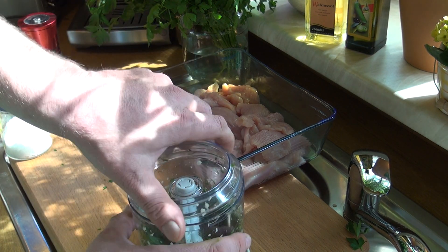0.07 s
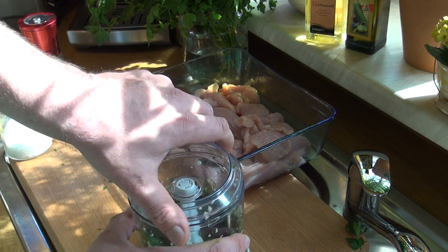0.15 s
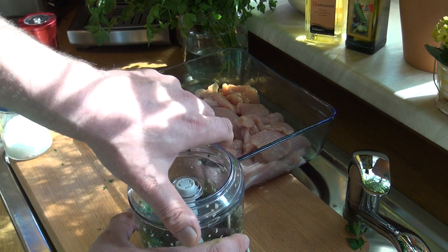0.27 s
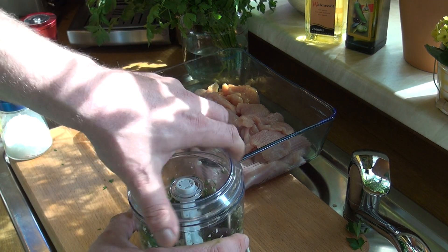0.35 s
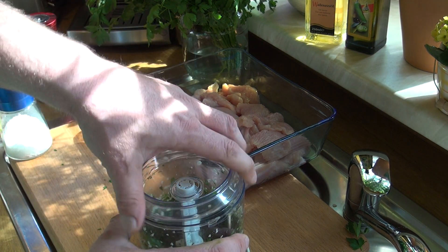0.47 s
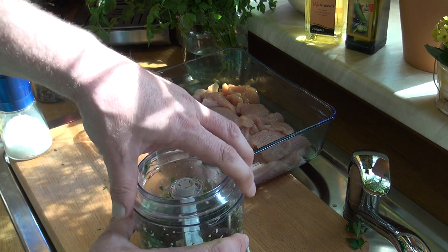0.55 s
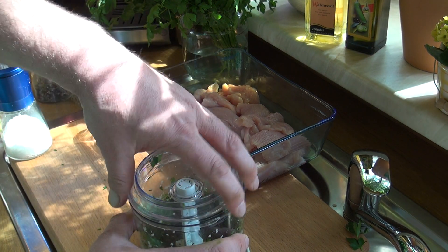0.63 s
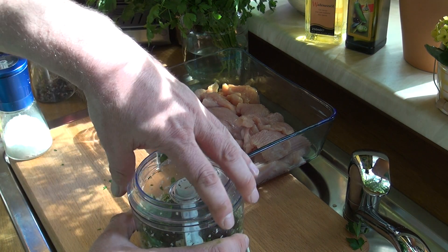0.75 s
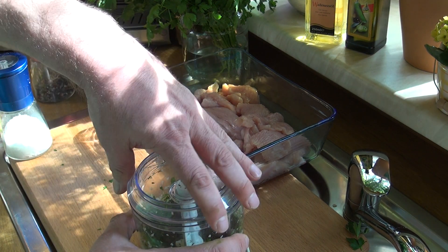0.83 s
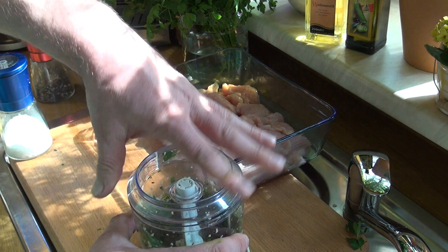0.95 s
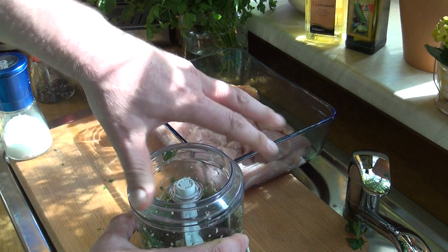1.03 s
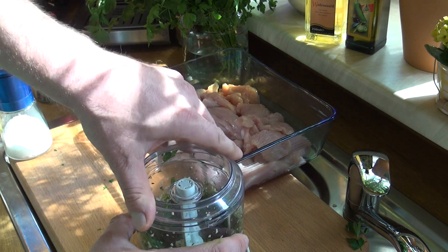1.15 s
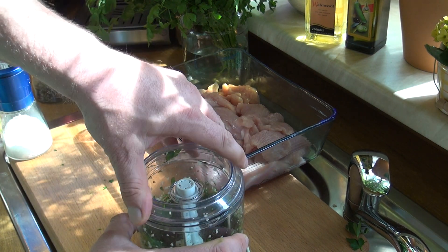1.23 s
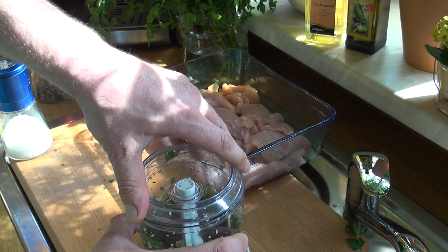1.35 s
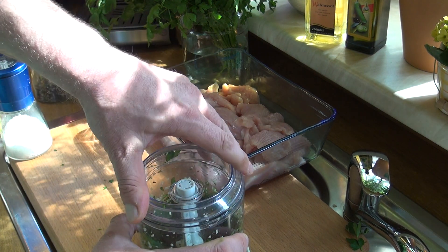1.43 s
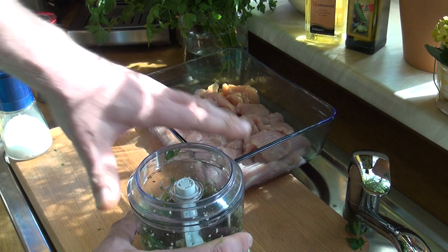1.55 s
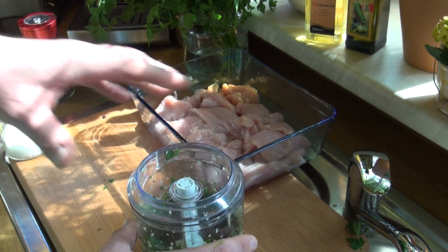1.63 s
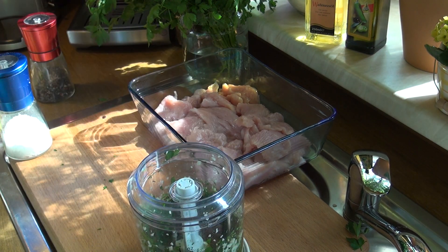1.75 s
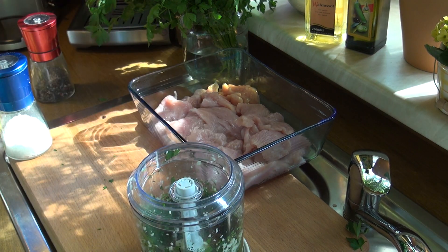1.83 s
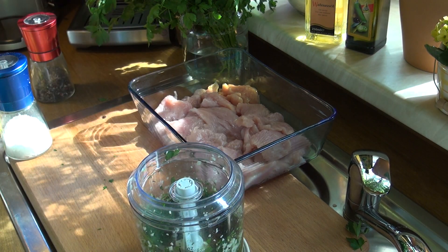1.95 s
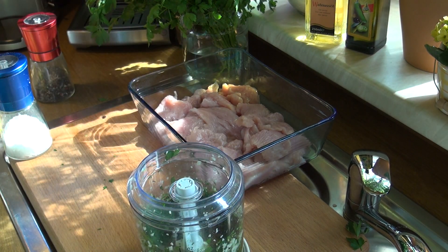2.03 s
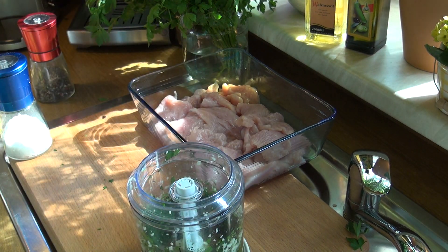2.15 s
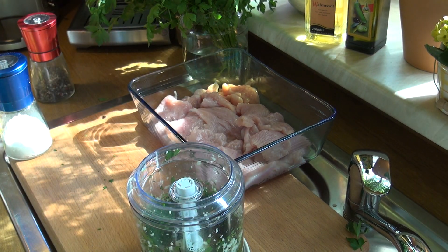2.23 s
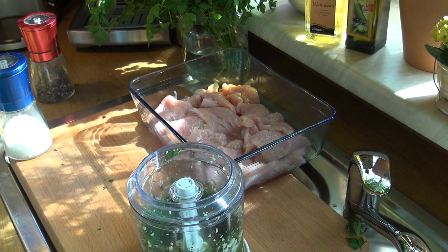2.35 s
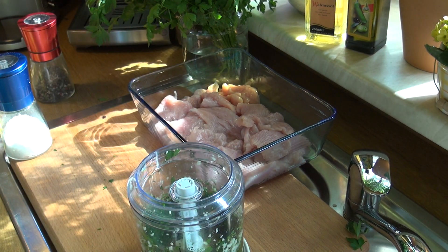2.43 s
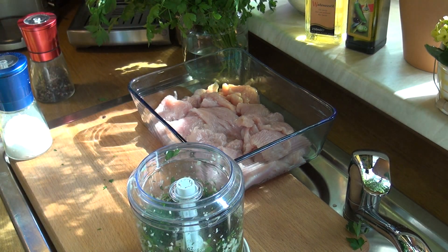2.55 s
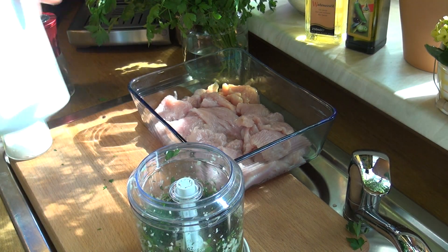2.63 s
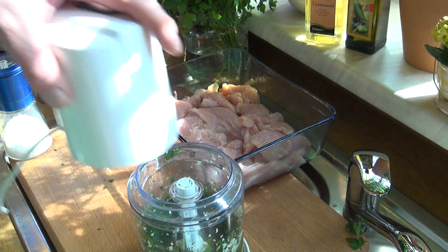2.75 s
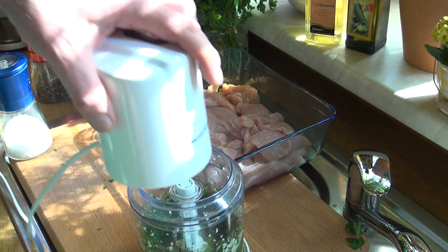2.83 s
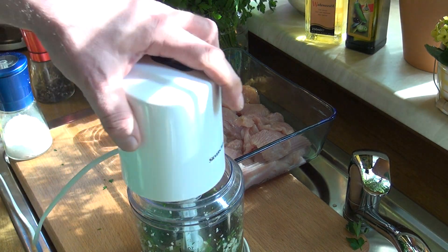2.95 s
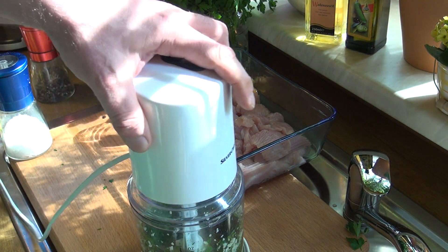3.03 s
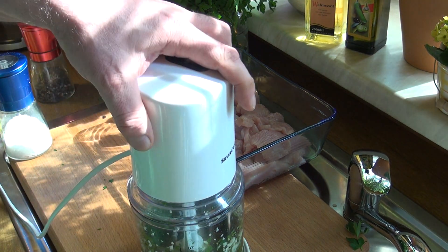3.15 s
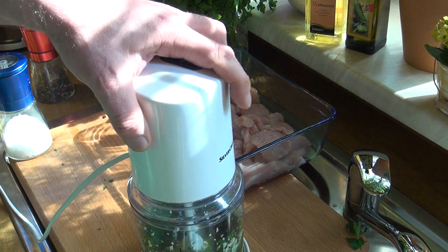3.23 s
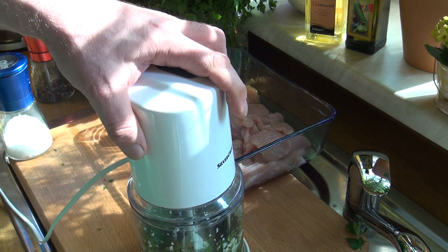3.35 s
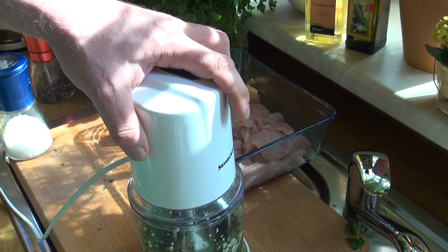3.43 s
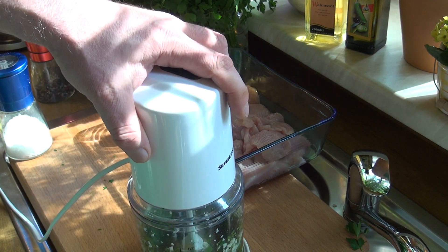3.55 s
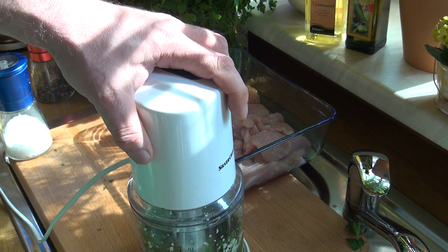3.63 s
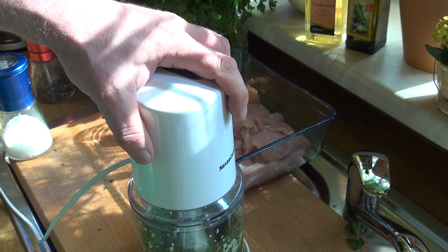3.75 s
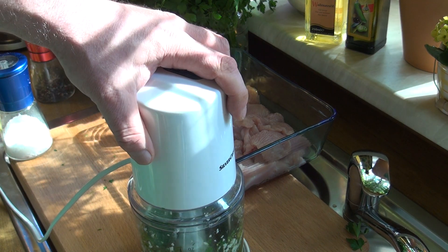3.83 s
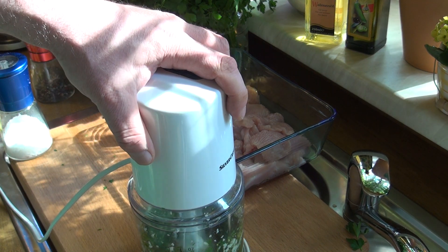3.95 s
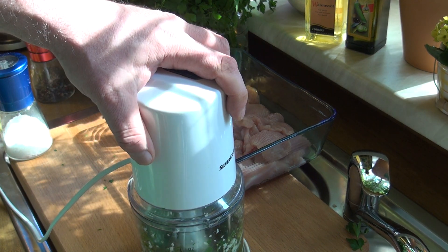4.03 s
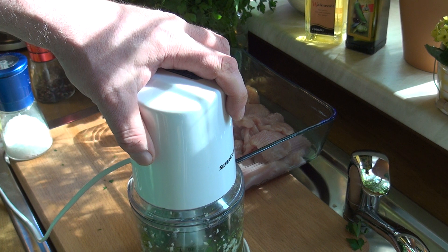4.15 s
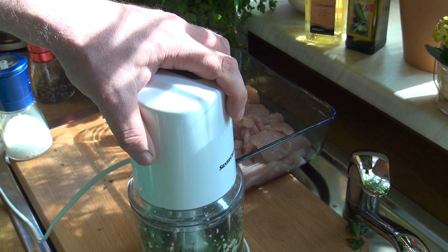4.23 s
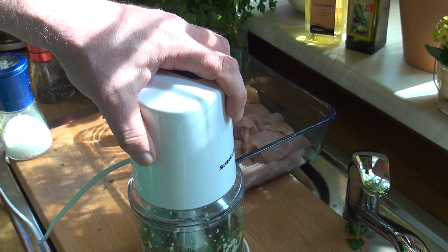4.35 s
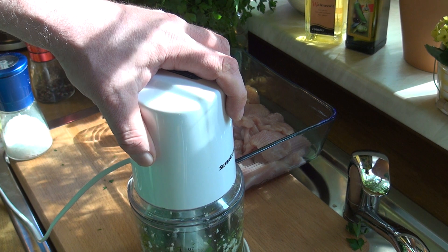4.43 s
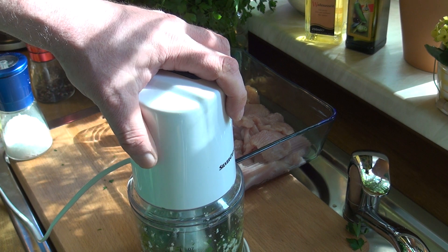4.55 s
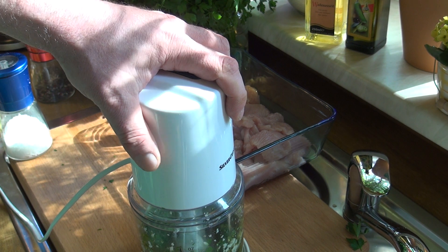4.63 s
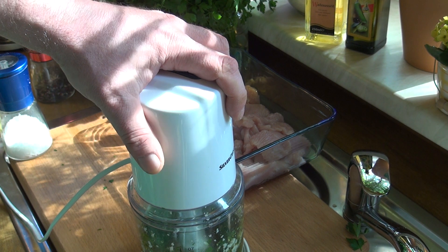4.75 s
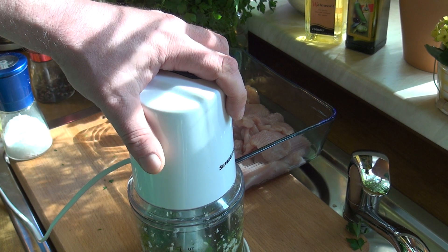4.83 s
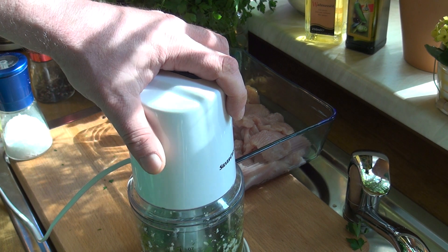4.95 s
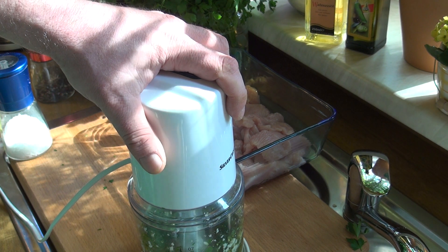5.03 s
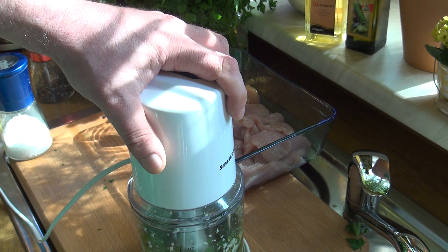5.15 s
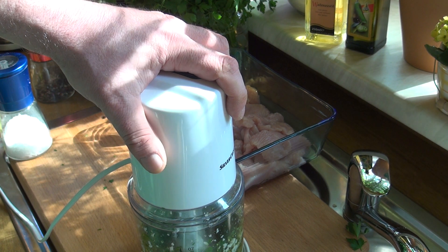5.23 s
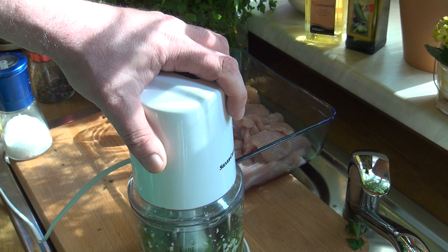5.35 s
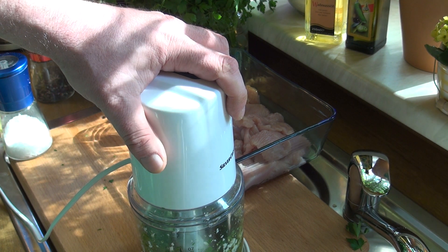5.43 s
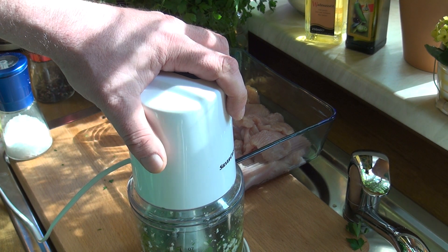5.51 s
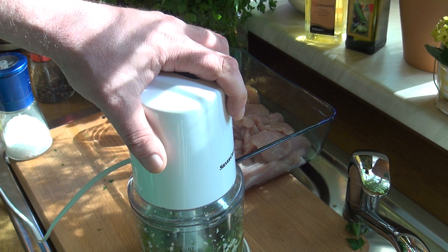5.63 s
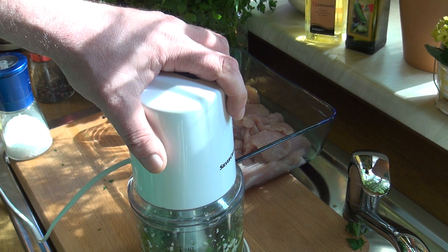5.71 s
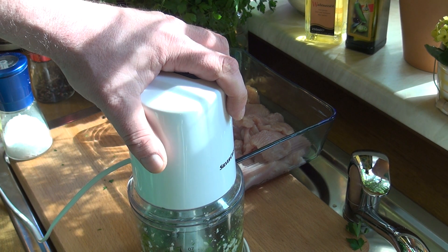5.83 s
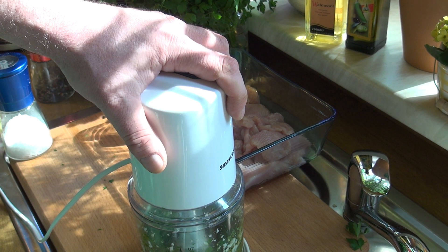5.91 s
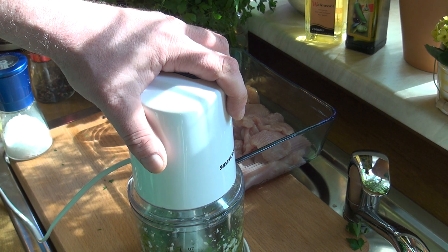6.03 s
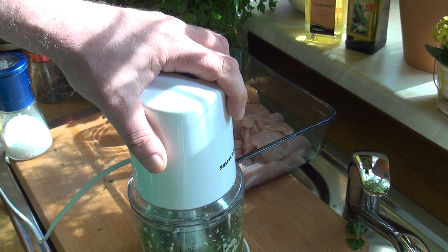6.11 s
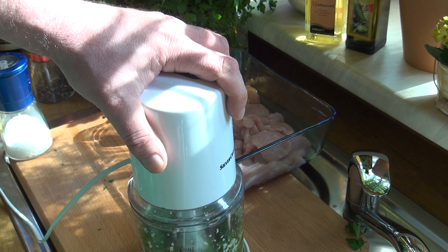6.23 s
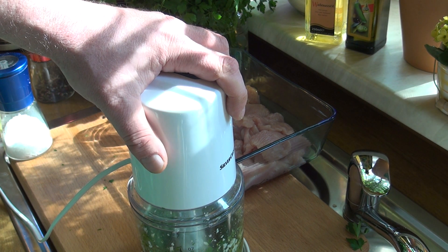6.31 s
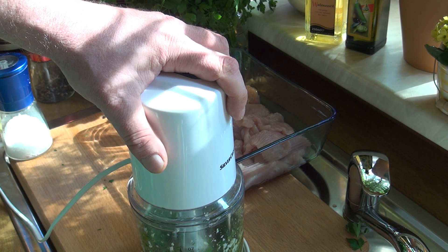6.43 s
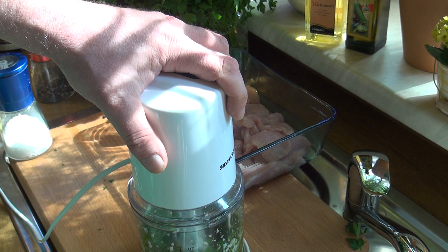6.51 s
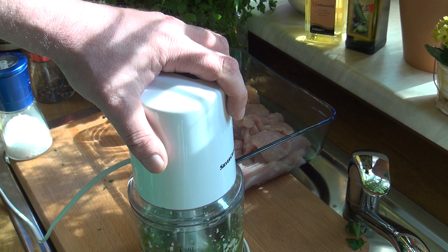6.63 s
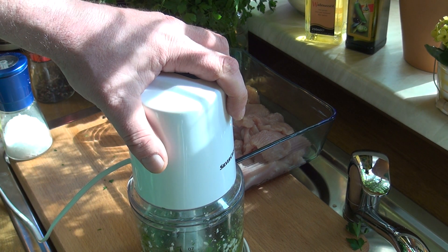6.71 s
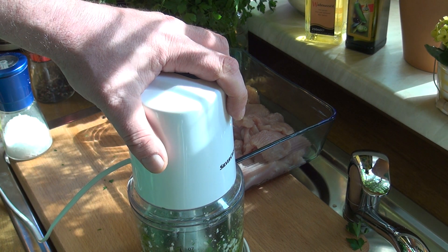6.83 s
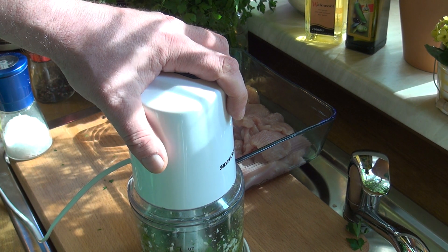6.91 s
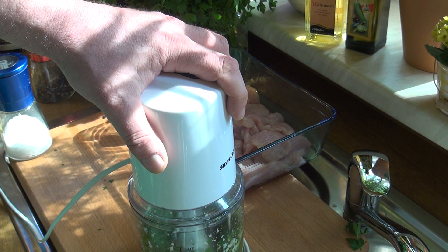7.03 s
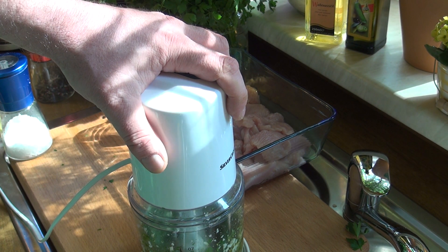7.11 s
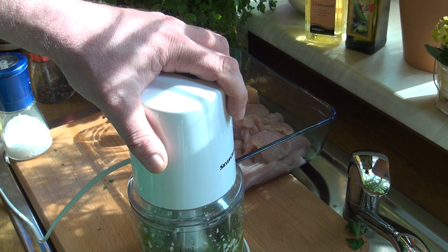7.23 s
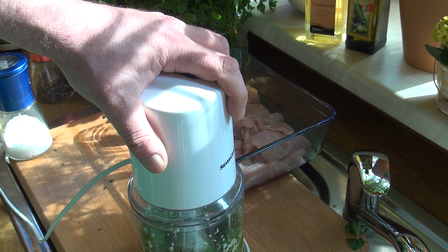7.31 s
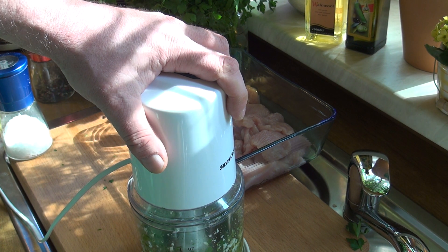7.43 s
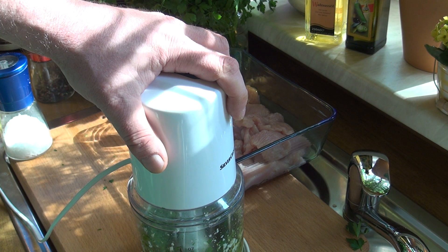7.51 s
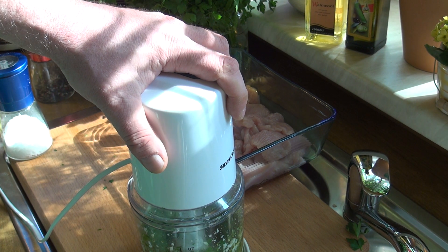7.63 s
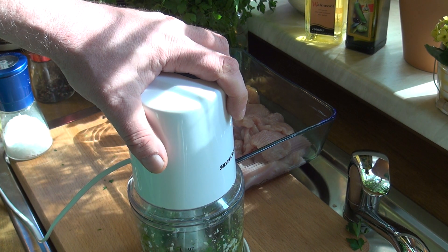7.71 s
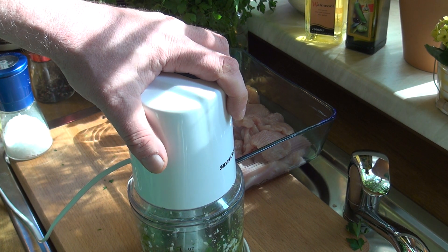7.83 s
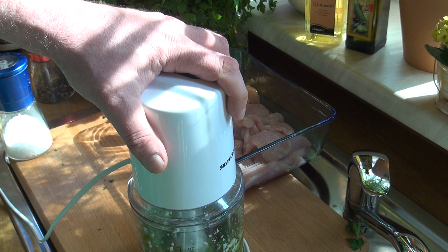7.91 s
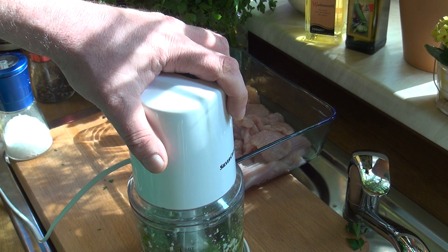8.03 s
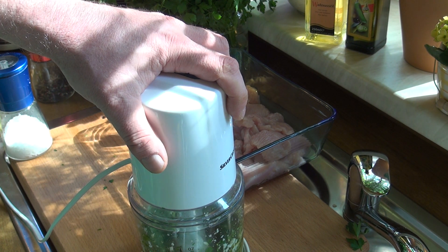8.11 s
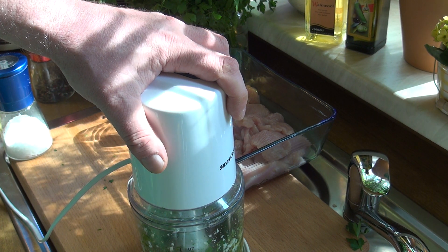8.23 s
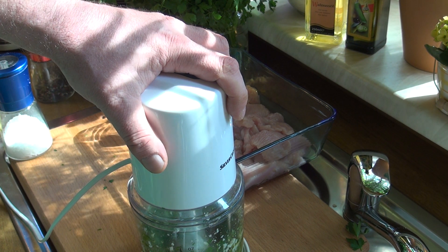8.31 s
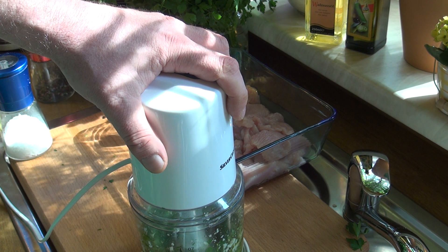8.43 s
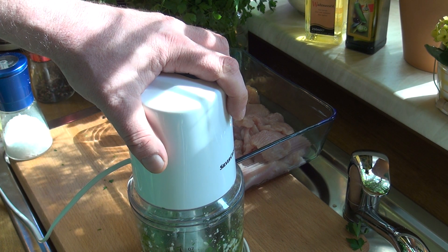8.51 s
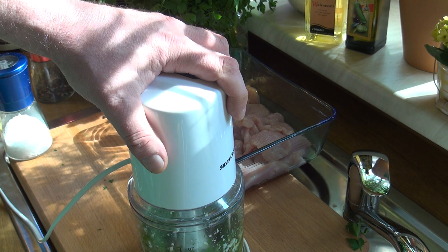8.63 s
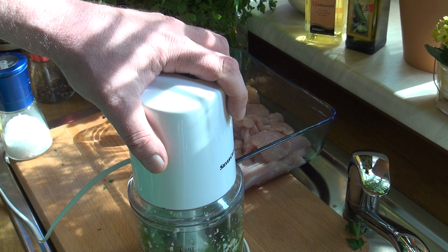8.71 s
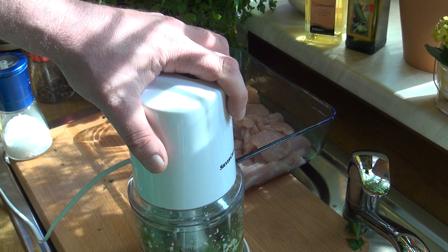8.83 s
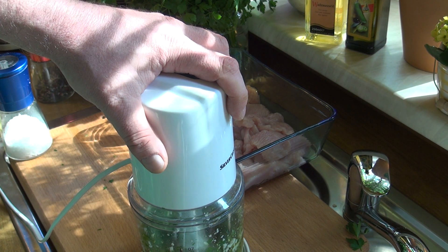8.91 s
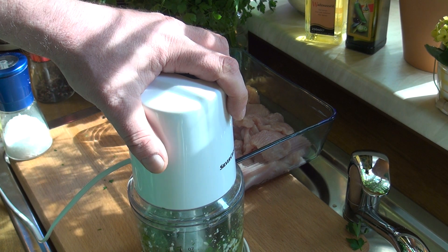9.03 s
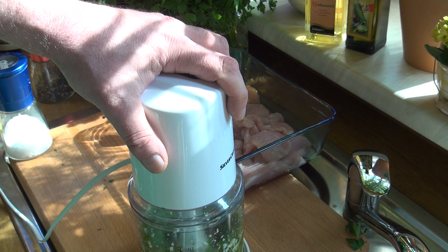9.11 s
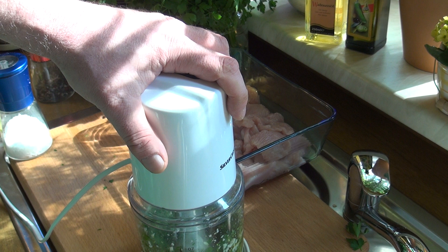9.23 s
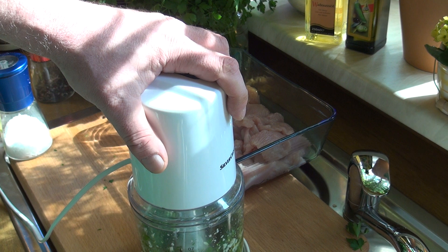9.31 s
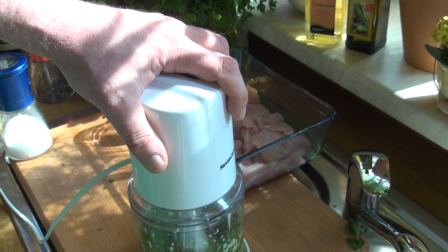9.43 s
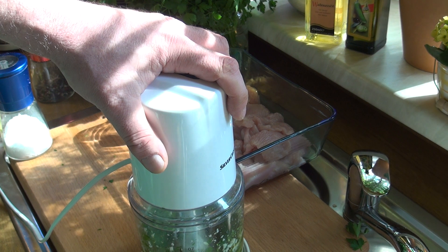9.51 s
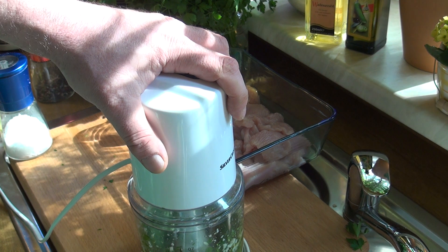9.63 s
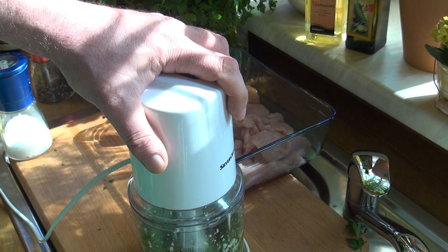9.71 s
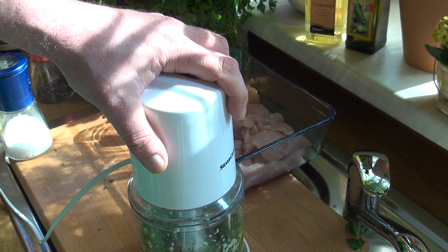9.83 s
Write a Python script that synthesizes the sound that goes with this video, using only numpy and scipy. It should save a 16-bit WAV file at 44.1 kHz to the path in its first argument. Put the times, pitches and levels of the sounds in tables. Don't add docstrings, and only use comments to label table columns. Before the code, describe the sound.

Close up in a quiet kitchen, a thin plastic lid knocks and ticks on a bowl, rubs briefly as it twists, then snaps sharply home with more clicks. A near-silent pause follows. A hollow motor block clatters onto the bowl and is pressed down, then a small electric motor starts abruptly and runs continuously, harsh rattling gears over a thin wavering whine and board hum.

```python
import sys
import numpy as np
from scipy import signal
from scipy.fft import rfft, irfft, next_fast_len
from scipy.io import wavfile

SR = 44100
rng = np.random.default_rng(int(sys.argv[2]) if len(sys.argv) > 2 else 0)


def unload_audio(sound):
    columns = np.transpose(np.atleast_2d(sound))
    steps = np.round(np.clip(columns, -1, 1) * 32767)
    wavfile.write(sys.argv[1], SR, steps.astype(np.int16))


def to_linear_factor(level_db):
    exponent = np.asarray(level_db, float) / 20
    return 10 ** exponent


N = 434826
BLOCK_FROM_S, SET_DOWN_S, SWITCH_ON_S = 2, 2.95, 3.622

# (frequency [Hz], width [Hz], gain [dB])
BOWL_PEAKS = [(244, 47, 11), (314.6, 67, 12.5), (449, 45, 11), (800, 170, 4.5), (1070, 40, 1.5),
              (1580, 90, -4), (2500, 400, -5.5)]


def rms_one(x):
    return x / np.sqrt(np.mean(x ** 2) + 1e-20)


def in_time(rows):
    s, *columns = np.transpose(rows)
    return [np.interp(np.arange(N) / SR, s, c) for c in columns]


def coloured(x, points):
    size = next_fast_len(N)
    hz, db = np.transpose(points)
    bins = np.fft.rfftfreq(size, 1 / SR) + 1
    gain = to_linear_factor(np.interp(np.log(bins), np.log(hz + 1), db))
    return irfft(rfft(x, size) * gain, size)[..., :N]


def band(x, low_hz, high_hz):
    return signal.sosfilt(signal.butter(2, [low_hz, high_hz], "band", fs=SR, output="sos"), x)


def resonant(x, peaks):
    rows = []
    for hz, width, db in peaks:
        w, a = 2 * np.pi * hz / SR, to_linear_factor(db / 2)
        k = np.pi * width / SR
        row = np.array([1 + k * a, -2 * np.cos(w), 1 - k * a, 1 + k / a, -2 * np.cos(w), 1 - k / a])
        rows.append(row / (1 + k / a))
    return signal.sosfilt(np.array(rows), x)


def drift(rate):
    r = np.exp(-32 * np.pi * rate / SR)
    slow = signal.lfilter([1], [1, -2 * r, r * r], rng.standard_normal(N // 16 + 3002))[3000:]
    return np.interp(np.arange(N) / 16, np.arange(len(slow)), rms_one(slow - slow.mean()))


def grit(per_s, spread_db):
    sizes = to_linear_factor(spread_db * np.minimum(rng.exponential(1, N), 4)) * rng.choice([-1, 1], N)
    return sizes * (rng.random(N) < per_s / SR) + 1e-9


def struck(at, db):
    clicks = np.zeros(N)
    clicks[at] = to_linear_factor(db)
    return clicks


def ring(clicks, hz, t60):
    r, w = to_linear_factor(-60 / (t60 * SR)), 2 * np.pi * hz / SR
    return signal.lfilter([0, np.sin(w)], [1, -2 * r * np.cos(w), r * r], clicks + 1e-18)


def decay(clicks, t60):
    return signal.lfilter([1], [1, -to_linear_factor(-60 / (t60 * SR))], clicks)


def settling(start_db, rise_s):
    return start_db * np.exp(-np.maximum(np.arange(N) / SR - SWITCH_ON_S, 0) / rise_s)


def motor():
    # (time [s], speed [turns/s])
    shaft_curve = [(3.62, 55), (3.7, 72), (3.8, 83), (3.92, 86), (4.1, 87.5), (4.45, 89.5), (4.85, 90.6),
                   (5.5, 90), (6.4, 91.2), (6.95, 91.4), (7.2, 90.2), (7.55, 91.3), (7.95, 92), (8.3, 91.2),
                   (8.6, 90.1), (8.85, 90.2), (8.97, 91.8), (9.3, 91.3), (9.86, 91.6)]
    speed, = in_time(shaft_curve)
    turn = 2 * np.pi * np.cumsum(speed * (1 + .009 * drift(6))) / SR
    onset = np.clip((np.arange(N) / SR - SWITCH_ON_S) / 0.0067, 0, 1)
    return (shell_rattle(turn) + gear_whine(speed, turn)) * onset


def shell_rattle(turn):
    # (frequency [Hz], level [dB])
    shell_tilt = [(15, -55), (25, -24.5), (82, -26.5), (200, -10.5), (249, -6.5), (591, -8.5), (1100, -1.5),
                  (1290, -5), (2050, -2), (2280, -2), (3250, -2.5), (3720, 1.5), (5140, -7.5),
                  (12200, -30.5), (16000, -40.5)]
    # (frequency [Hz], width [Hz], gain [dB])
    shell_peaks = [(110, 14, 6), (160, 14, 4), (249, 20, 9), (308, 18, 7), (458, 45, 4), (555, 25, 5),
                   (641, 20, 6), (780, 25, -7), (1137, 12, -5), (1529, 22, 5), (1724, 80, 5), (1904, 50, 4),
                   (2025, 70, 4), (2210, 60, -9), (2572, 45, 5), (2694, 35, 6), (2849, 35, 5),
                   (2913, 35, 6), (2985, 45, -7), (3037, 35, 4), (3320, 200, -4), (3580, 65, 2.5),
                   (3735, 60, 4.5), (3880, 150, 1), (4093, 40, 5.5), (4230, 80, -5), (4345, 90, 4),
                   (4985, 60, -5), (5430, 170, 6), (6830, 200, 3)]
    # (time [s], level [dB])
    load_curve = [(3.7, -1), (4.0, .5), (4.4, -0.5), (4.75, 0), (5.3, 0), (5.6, -0.5), (5.9, 0.5), (6.4, 0),
                  (7.1, 1), (7.35, -0.5), (7.7, 0), (8.0, 0), (8.2, 0), (8.55, 1), (8.9, 0.3), (9.2, 0.5),
                  (9.6, 0), (9.86, 1)]
    # (low [Hz], high [Hz], start [dB], settling time [s])
    grip_bands = [
        (442, 690, -4, 0.55),
        (660, 780, -4, .15),
        (2930, 4100, 2, 0.71),
        (3620, 4040, -4, 0.83),
    ]
    t = np.arange(N) / SR
    body = resonant(coloured(chatter(turn), shell_tilt), shell_peaks)
    for lag, db in [(.0123, -22), (.019, -20), (.031, -18), (.047, -18)]:
        body = body + to_linear_factor(db) * np.roll(body, round(lag * SR))
    body = rms_one(body)
    low = signal.sosfilt(signal.butter(2, 620, fs=SR, output="sos"), body)
    top = signal.sosfilt(signal.butter(2, 5000, "high", fs=SR, output="sos"), body)
    hum = to_linear_factor(0.8 + 0.53 * (t - SWITCH_ON_S) + 0.3 * drift(0.32))
    hiss = to_linear_factor(1.44 + settling(-15, 0.05) + 0.6 * drift(33))
    level_db = -20 + settling(-17, 0.012) + in_time(load_curve)[0] + 0.97 * drift(13.7)
    out = to_linear_factor(level_db) * (body + (hum - 1) * low + (hiss - 1) * top)
    slack_hz = 2840
    out += (to_linear_factor(settling(4, 0.11)) - 1) * band(out, slack_hz / 1.9, slack_hz * 1.05)
    dulling_db_per_s = -0.37
    out += (to_linear_factor(dulling_db_per_s * (t - 6.0)) - 1) * band(out, 2100, 9900)
    for low_hz, high_hz, start_db, settle_s in grip_bands:
        out += (to_linear_factor(settling(start_db, settle_s)) - 1) * band(out, low_hz, high_hz)
    return out


def chatter(turn):
    # (time [s], share)
    gear_play = [(3.62, 0.33), (4.2, 2.5), (5.2, 3.1), (5.7, 0.4), (6.6, 3.6), (7.3, 0.76), (8.2, 1.2),
                 (9, 2.4), (9.86, 1.5)]
    # (low [Hz], high [Hz], once-a-turn depth, twice-a-turn depth, flutter depth)
    rattle_zones = [
        (20, 866, 0.098, 0.12, 0.31),
        (627, 1350, 0.025, 0.28, 0.085),
        (1690, 2320, 0.076, 0.06, 0.45),
        (2280, 3230, 0.38, 0.074, 0.41),
        (3190, 4330, 0.37, 0.48, 1),
        (4480, 5460, 0.018, 0.044, 0.29),
        (7800, 32000, 0.031, 0.041, 0.33),
    ]
    mains_hz = 50
    size = next_fast_len(N)
    bins = np.fft.rfftfreq(size, 1 / SR)
    once = .55 * in_time(gear_play)[0] * np.sin(turn)
    once += .7 * np.sin(.79 * turn)
    once += .45 * np.sin(4 * np.pi * mains_hz * np.arange(N) / SR)
    once += .75 * np.sin(4 * turn) + .4 * np.sin(3 * turn) + .45 * np.sin(1.42 * turn)
    shared = 0.3 * rms_one(band(drift(77), 40, 540)) + bounce(turn)
    out = 0
    for low, high, once_depth, twice_depth, flutter in rattle_zones:
        swing = once_depth * once + twice_depth * np.sin(2 * turn + 1)
        swing += flutter * (0.68 * shared + 0.27 * drift(150))
        teeth = (1 + np.tanh(swing)) * grit(10000, spread_db=1.27)
        share = 1 / (1 + (low / (bins + 1)) ** 6) - 1 / (1 + (high / (bins + 1)) ** 6)
        out = out + rfft(rms_one(teeth), size) * np.sqrt(np.maximum(share, 0))
    return irfft(out, size)[:N]


def bounce(turn):
    per_turn, wander, sharpness, depth = 1.08, .3, 1.6, .9
    pace = per_turn * np.gradient(turn) * (1 + wander * drift(30))
    bursts = np.exp(sharpness * np.cos(np.cumsum(pace)))
    return depth * rms_one(bursts - bursts.mean())


def gear_whine(speed, turn):
    mesh_orders = [10, 12.11, 22.1]
    # (level [dB], share of the pressure shift)
    mesh_levels = [(-38.5, 0.048), (-36, 1), (-33.5, 0.037)]
    mesh_wobble = [.0045, .007, .006]
    # (time [s], shift [dB])
    press_curve = [(3.65, -20), (4.4, -28), (4.8, -18), (5.03, 1), (5.33, -8), (5.95, -9), (6.04, 1),
                   (7.18, 3), (7.3, -3), (7.6, 5), (7.94, 6), (8.11, -2), (8.35, 6.5), (8.47, -27),
                   (8.85, -13), (8.96, 2.5), (9.86, 3)]
    # (time [s], level [dB])
    bite_curve = [(3.62, -2), (4.1, 7), (4.5, 2.5), (5.3, 2), (6.0, 0.5), (6.5, 1), (6.9, -4), (7.25, -1),
                  (7.7, -1), (8.1, 0), (8.45, 1.5), (8.85, 8.5), (8.92, -6), (9.86, 2)]
    t = np.arange(N) / SR
    shift, = in_time(press_curve)
    bites = in_time(bite_curve)[0], 0, 0
    out = np.zeros(N)
    for order, (level_db, share), bite, unsteady in zip(mesh_orders, mesh_levels, bites, mesh_wobble):
        db = level_db + share * shift + bite + settling(-22, 0.16)
        wobble = 1 + unsteady * drift(18)
        tone = np.sin(2 * np.pi * np.cumsum(order * speed * wobble) / SR)
        out += to_linear_factor(db + 1.0 + 2.6 * drift(18)) * tone
    for order in (13.0, 11.4, 15.5, 8.7):
        out += to_linear_factor(-39 - 14 * np.maximum(t - 3.8, 0) + 3 * drift(10)) * np.sin(order * turn)
    return out


def knocks():
    # (low [Hz], high [Hz], lid t60 [s], motor block t60 [s], rise [s], offset [dB])
    knock_bands = [
        (138, 790, 0.18, 0.21, 0.0026, 1),
        (510, 2190, 0.11, 0.15, 0.00051, -0.5),
        (1710, 4530, 0.028, 0.099, 0.00061, -4),
        (5200, 11600, 0.053, 0.044, 0.00048, -10),
    ]
    # (frequency [Hz], width [Hz], gain [dB])
    rim_peaks = [(1100, 120, 4), (1450, 350, -5), (2600, 400, 9), (3400, 700, -7), (4700, 500, 6),
                 (6000, 500, 5), (9300, 1200, 3)]
    # (frequency [Hz], width [Hz], gain [dB])
    lifted_peaks = [(800, 180, 4.5), (1650, 1000, 9), (2670, 640, 5), (3830, 1600, 6.5), (6000, 860, 10.5)]
    # (frequency [Hz], width [Hz], gain [dB])
    block_peaks = [(1600, 300, 3), (2480, 450, 10), (3600, 900, -8), (5000, 800, 5), (6400, 600, 5),
                   (7800, 500, 7), (9200, 1500, -5)]
    kitchen_db, kitchen_t60 = -14, .33
    rows = knock_parts()
    at = np.round(rows[:, 0] * SR).astype(int)
    lifted, down = BLOCK_FROM_S * SR, round(SET_DOWN_S * SR)
    shiver = resonant(grit(9000, spread_db=3.0), BOWL_PEAKS)
    shiver = np.r_[resonant(shiver[:lifted], rim_peaks),
                   resonant(shiver[lifted:down], lifted_peaks),
                   resonant(shiver[down:], block_peaks)]
    out = np.zeros(N)
    for k, (low_hz, high_hz, lid_t60, block_t60, rise, db) in enumerate(knock_bands):
        starts = struck(at, rows[:, 2 + k] + db)
        shape = np.r_[decay(starts[:lifted], lid_t60), decay(starts[lifted:], block_t60)]
        shape += to_linear_factor(kitchen_db) * decay(starts, kitchen_t60)
        up = np.exp(-1 / (rise * SR))
        out += signal.lfilter([1 - up], [1, -up], shape) * rms_one(band(shiver, low_hz, high_hz))
    crack = decay(struck(at, rows[:, 1] - 9), 0.033)
    out += crack * rms_one(band(shiver, 580, 9200))
    return out + slides(shiver) + knock_modes(at, rows)


def knock_parts():
    # (time [s], strength [dB], weight passed to the board [dB], hardness of the edge [dB])
    lid_hits = [(0.002, -36, 3, -9), (0.031, -44.5, 11, 4), (0.0692, -24.5, -1, -8), (0.1848, -49.5, 2, 5),
                (0.2145, -39, 5.5, -6), (0.348, -54.5, 0, -11), (0.595, -51, 11, -7),
                (0.68, -34.5, 2.5, -11), (0.6878, -23, 1.5, -7), (0.6948, -23.5, -4, -12),
                (0.805, -17.5, -6, -14), (0.883, -46, -2, -8), (0.939, -47.5, -1, -12),
                (1.1615, -41.5, 2, 0), (1.176, -31.5, -4, -17), (1.245, -24, -13, -8), (1.2962, -46, -1, 6),
                (1.386, -39, -10, -6), (1.413, -54, 4, -1), (1.503, -56, 3, -1), (1.524, -51, -18, -13),
                (1.536, -52, 0, -15), (1.546, -56, 4, 6), (1.565, -58, 1, -15)]
    # (time [s], strength [dB], weight passed to the board [dB], hardness of the edge [dB])
    block_hits = [(2.249, -56, 7, -4), (2.271, -59, 6, -20), (2.398, -66, -3, -26), (2.403, -59.5, -3, -28),
                  (2.492, -60, -3, -11), (2.633, -54.5, -15, -23), (2.739, -53, -3, -22),
                  (2.765, -57, -12, -18), (2.855, -39, -3, -7.5), (2.981, -50, -6, -16),
                  (2.991, -32, -3, -0.5), (2.996, -33, -0.5, -4), (3.014, -28, -4, -8),
                  (3.075, -43.5, 3, -11), (3.159, -41.5, 5.5, -25), (3.302, -63, 2.5, -20),
                  (3.311, -54, 13, -25), (3.324, -23.5, -6, -4.5), (3.52, -63, 6, -17),
                  (3.585, -53, 2, -29), (3.626, -27.5, -2, -10)]
    # (tick [dB], tick share of hardness, rim [dB], rim share of hardness)
    lid_edge = (12.5, 0.95, -2.5, 0.5)
    block_edge = (25.4, 2.6, 6.3, 0.71)
    rows = []
    for hits, edge in ((lid_hits, lid_edge), (block_hits, block_edge)):
        tick_db, tick_share, rim_db, rim_share = edge
        s, db, weight, hard = np.transpose(hits)
        tick = db + tick_db + tick_share * hard
        rim = db + rim_db + rim_share * hard
        rows += zip(s, tick, db + weight, db, rim, db + hard)
    return np.array(rows)


def slides(shiver):
    # (time [s], level [dB], t60 [s])
    slide_events = [(0.072, -36, .22), (0.216, -51, 0.27), (0.69, -43, 0.31), (0.884, -51, .06),
                    (1.18, -48, .15), (1.232, -43, .1), (1.25, -50, 0.35), (1.69, -63, 0.7),
                    (1.74, -63, .4), (2.225, -62, .3), (2.981, -64, .1), (3.31, -60, .1),
                    (2.999, -27.5, 0.32), (3.17, -69, .5), (3.33, -48, 0.15)]
    t = np.arange(N) / SR
    slide = sum(to_linear_factor(db - 60 * (t - s).clip(0) / t60) * (t > s) for s, db, t60 in slide_events)
    return slide * rms_one(band(shiver, 1100, 8400))


def knock_modes(at, rows):
    # (frequency [Hz], level [dB], t60 [s])
    lid_modes = [(257, -16, 0.15), (361, -4, 0.22), (438, 0, 0.076), (820, -17, 0.21), (1500, -4, 0.041),
                 (2530, -11, 0.064), (4170, -34, 0.021), (4900, -11, 0.037), (5270, -23, 0.031)]
    # (frequency [Hz], level [dB], t60 [s])
    seated_modes = [(1580, 1, 0.044), (1404, -5, 0.063)]
    # (frequency [Hz], level [dB], t60 [s])
    block_modes = [(255, 2.5, 0.11), (300, -14, 0.075), (480, -17, 0.073), (583, -11, 0.064),
                   (1510, -5, .04), (2170, -8, 0.05), (2490, -10.5, 0.16), (4830, -22, .03),
                   (6130, -9, 0.033)]
    s = rows[:, 0]
    with_lid = s < BLOCK_FROM_S
    seated = (s > 1.2) & with_lid
    luck = rng.normal(0, 2.5, (len(at), 9))
    out = np.zeros(N)
    for modes, mine in ((lid_modes, with_lid), (seated_modes, seated), (block_modes, s > SET_DOWN_S)):
        for k, (hz, db, t60) in enumerate(modes):
            part = 2 + np.searchsorted([600, 2000], hz)
            out += ring(struck(at[mine], (rows[:, part] + luck[:, k])[mine] + db + 0.5), hz, t60)
    return out


def ticks():
    # (time [s], peak [dB], ring [Hz])
    touches = [(0.071, -8.5, 4730), (0.156, -44, 10000), (0.2154, -40, 1000), (0.678, -36, 9500),
               (0.688, -15, 9500), (0.6955, -10, 3800), (0.8082, -9, 4500), (0.9245, -42, 6000),
               (1.088, -44, 9000), (1.1615, -30, 9800), (1.168, -40, 12000), (1.1765, -30, 4500),
               (1.185, -36, 9000), (1.1905, -36, 9500), (1.2365, -45, 8200), (1.247, -17, 9050),
               (1.2968, -13.5, 9500), (1.3865, -33, 8900), (1.5455, -35, 8000), (2.8545, -25, 4500),
               (2.9904, -13, 5500), (2.996, -13, 5000), (3.006, -19, 2600), (3.0255, -21, 2400),
               (3.034, -20, 2700), (3.05, -24, 2500), (3.061, -23, 2300), (3.1640, -33, 1600),
               (3.3246, -19, 6500), (3.331, -16, 2200), (3.337, -20, 2300), (3.3615, -28, 2400)]
    cycles = 8.2
    out, t = np.zeros(N + 600), np.arange(600) / SR
    for s, db, hz in touches:
        at = round(s * SR)
        w = 2 * np.pi * hz * t
        rings = np.sin(w) + .6 * np.sin(1.25 * w) - .5 * np.sin(0.76 * w)
        out[at:at + len(t)] += to_linear_factor(db - 60 * t * hz / cycles) * rings
    return out[:N]


def body_rings():
    # (time [s], peak [dB], frequency [Hz], t60 [s])
    soft_blows = [(0.002, -27, 480, 0.055), (0.0705, -17, 523, 0.053), (0.2145, -26, 800, 0.036),
                  (0.6885, -26, 420, .1), (0.6962, -16, 330, 0.16), (0.8067, -22, 480, 0.064),
                  (0.594, -34, 330, .12), (0.606, -36, 330, .1), (0.96, -50, 310, .6),
                  (1.178, -39, 1055, 0.17), (3.1635, -32, 760, .04), (2.992, -23, 646, 0.037),
                  (3.011, -19, 330, 0.075), (3.046, -33, 300, 0.13), (3.3245, -19.5, 643, 0.088),
                  (3.333, -26.5, 306.4, .3), (3.355, -28, 219, .15), (3.6276, -28, 434, 0.086)]
    out, t = np.zeros(N), np.arange(round(.4 * SR)) / SR
    for s, db, hz, t60 in soft_blows:
        at = round(s * SR)
        envelope = to_linear_factor(db - 60 * t / t60) * (1 - np.exp(-t * hz))
        out[at:at + len(t)] += envelope * np.sin(2 * np.pi * hz * t)
    return out


def bowl_wall():
    # (time [s], peak [dB])
    wall_taps = [(0.0024, -29), (0.0334, -39), (0.068, -21), (0.214, -35), (0.399, -44), (0.439, -41),
                 (0.598, -42), (0.6986, -18.5), (0.804, -26), (1.1622, -39), (1.1994, -39)]
    s, db = np.transpose(wall_taps)
    taps = signal.lfilter([.2], [1, -.8], struck(np.round(s * SR).astype(int), db - 6.5))
    return ring(taps, 1064, 0.21) + 0.67 * ring(taps, 1077, 0.27)


def twist():
    # (time [s], level [dB])
    twist_curve = [
        (0.345, -75),
        (0.353, -53.5),
        (0.395, -43.5),
        (0.42, -47),
        (0.46, -45),
        (0.6, -45.5),
        (0.625, -53),
        (0.669, -49),
        (0.69, -30),
    ]
    # (frequency [Hz], level [dB])
    thread_colour = [(76, -45), (130, -9), (328, -5), (444, -4.5), (678, -20), (796, -13), (994, -25),
                     (1080, -13.5), (1320, -26), (1640, -17), (3330, -22.5), (4680, -20.5), (9480, -24),
                     (16000, -30)]
    t = np.arange(N) / SR
    slip = coloured(grit(4000 * to_linear_factor(3.5 * drift(30)), spread_db=2.5), thread_colour)
    slip = resonant(slip, [(1056, 40, 9.0), (330, 30, 5.4), (560, 150, 4.5), (9000, 2000, 3)])
    touching = (t > .345) & (t < .69)
    return to_linear_factor(in_time(twist_curve)[0] + 0.5) * touching * rms_one(slip)


def handling():
    # (time [s], pressure [dB], speed of the stroke as brightness [dB])
    grip_curve = [(0.0, -19, -32), (0.07, -32, -7), (0.19, -53, 2), (0.31, -54, 6), (0.69, -37, 7),
                  (0.77, -46.5, 17), (0.82, -44, -8), (0.95, -47, -10), (1.37, -41, -4), (1.52, -60, 3),
                  (1.9, -52.5, 4.5), (2.49, -67, 7), (2.89, -55, 12), (3.13, -39, -22), (3.21, -52, -1),
                  (3.35, -28, -14), (3.42, -36, -15), (3.62, -66, -4)]
    slip = resonant(grit(5000 * to_linear_factor(4.2 * drift(20)), spread_db=-5.0), BOWL_PEAKS)
    ranges_hz = [(150, 600), (550, 3000), (2600, 13000)]
    press, bright = in_time(grip_curve)
    levels = press, press + bright, press - 9.5 + 0.66 * bright
    rub = sum(to_linear_factor(db - 10.5) * rms_one(band(slip, *span)) for db, span in zip(levels, ranges_hz))
    t = np.arange(N) / SR
    return rub * np.interp(t, [.28, .31, .68, .69, 3.65, 3.7], [1, .1, .1, 1, 1, 0])


def thumps():
    # (time [s], peak [dB])
    pushes = [(0.002, -62), (0.069, -29), (0.694, -22.5), (0.806, -31), (1.175, -24.5), (1.244, -51),
              (1.53, -42), (2.223, -33), (2.27, -37), (2.86, -49), (3.012, -21.5), (3.16, -29),
              (3.324, -24.5)]
    s, db = np.transpose(pushes)
    push = signal.lfilter([.01], [1, -.99], struck(np.round(s * SR).astype(int), db - 15.0))
    worktop = ring(push, 74.3, 0.76)
    worktop += to_linear_factor(7.5) * ring(push, 113.5, 0.51)
    worktop += to_linear_factor(11.5) * ring(push, 148, 0.26)
    return band(worktop, 48, 400)


def background():
    # (frequency [Hz], level [dB])
    hush_colour = [(18, -31), (30, 15.5), (194, -6), (336, 2), (962, -9), (1070, -14), (1220, -6),
                   (3140, -25), (3670, -15), (16000, -20)]
    # (frequency [Hz], level [dB])
    hush_spread = [(20, 0), (1200, 0), (1700, -25), (4500, -25), (5500, 0), (9500, -3), (11000, -40)]
    # (frequency [Hz], width [Hz], gain [dB])
    room_peaks = [(310, 16, 11), (603, 84, 6.5), (1090, 40, 15), (1260, 36, 1), (2940, 250, 12)]
    mid, side = rng.standard_normal((2, N))
    air = mid + 0.25 * coloured(side, hush_spread) * np.array([[1], [-1]])
    hush = to_linear_factor(-60) * rms_one(resonant(coloured(air, hush_colour), room_peaks))
    rumble = to_linear_factor(-68 + 2 * drift(2.3)) * rms_one(band(rng.standard_normal(N), 43, 72))
    whistle = to_linear_factor(-81) * np.sin(2 * np.pi * 15680 * np.arange(N) / SR)
    return band(hush, 45, 18000) + rumble + whistle


def microphones(x):
    # (frequency [Hz], left minus right [dB])
    lean_curve = [(60, -11), (110, -2.5), (200, -1), (380, -1.5), (700, 2.5), (1290, 1), (2380, 1),
                  (4400, 0), (8120, 0.5), (15000, 0.0)]
    # (frequency [Hz], side minus mid [dB])
    side_curve = [(60, -2), (110, -9), (200, -29), (380, -30), (520, -25), (700, -21), (1290, -22.5),
                  (2380, -22.5), (4400, -23), (8120, -14), (15000, 2)]
    lean_points = lean_curve[:-1] + [(10200, 0)]
    lean = [coloured(x, [(hz, sign * db / 2) for hz, db in lean_points]) for sign in (1, -1)]
    lags = np.arange(round(.06 * SR))
    echoes = rng.standard_normal(len(lags)) * to_linear_factor(-60 * lags / (.12 * SR))
    room = signal.fftconvolve(x, echoes / np.linalg.norm(echoes))[:N]
    side = coloured(room, [(25, -14)] + side_curve[:-1] + [(10000, -17), (11000, -55)])
    return np.array(lean) + to_linear_factor(0.5) * side * np.array([[1], [-1]])


def scene():
    hands = band(knocks(), 90, 18000) + ticks() + body_rings() + bowl_wall()
    rub = twist() + handling()
    alike = band(rub, 1400, 5400)
    close = microphones(hands + rub - alike + motor())
    return close + alike + background() + thumps() * to_linear_factor(np.array([[-1.5], [1.5]]))


def roll_off(x):
    return signal.sosfilt(signal.butter(12, 16770, fs=SR, output="sos"), x)


def record(dry):
    top = signal.cheby2(16, 50, 16850, fs=SR, output="sos")
    limited = dry / (1 + (dry / .37) ** 4) ** .25
    return roll_off(signal.sosfilt(top, limited))


dry = scene()
out = record(dry)
unload_audio(out)
```